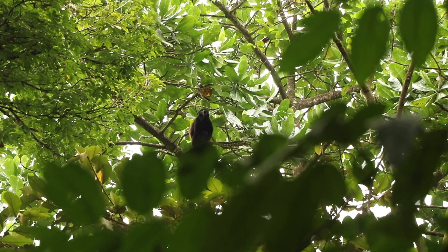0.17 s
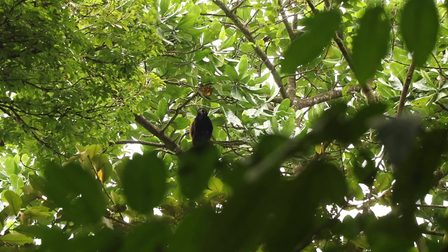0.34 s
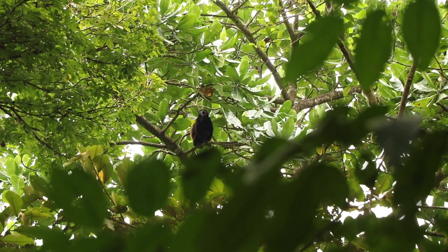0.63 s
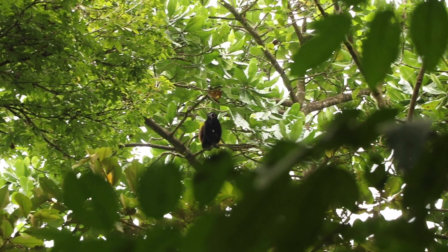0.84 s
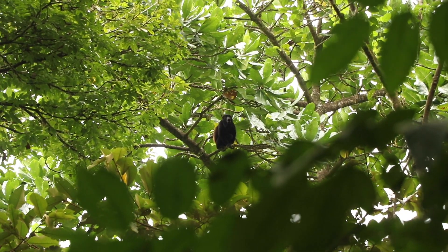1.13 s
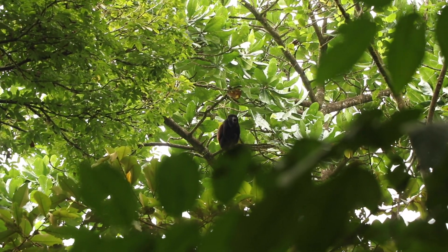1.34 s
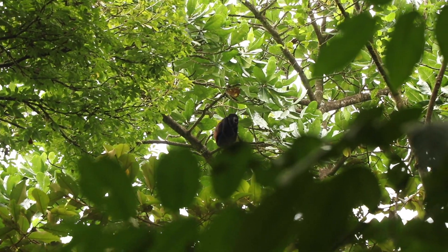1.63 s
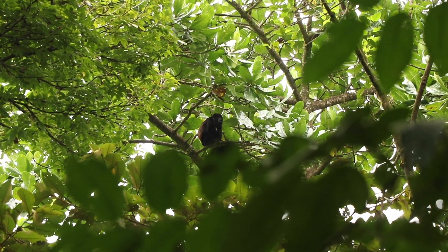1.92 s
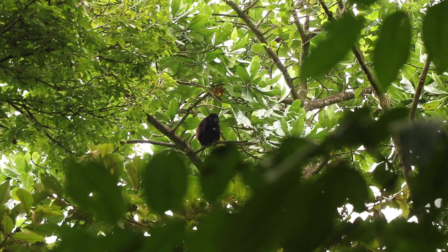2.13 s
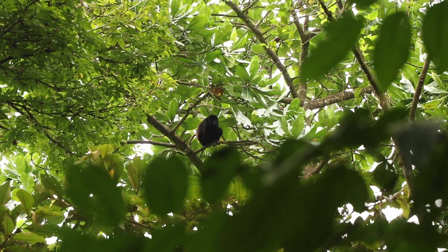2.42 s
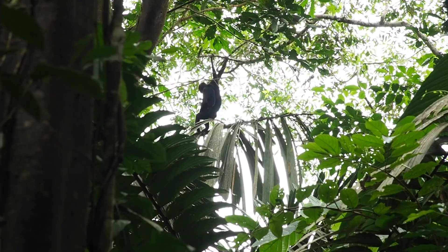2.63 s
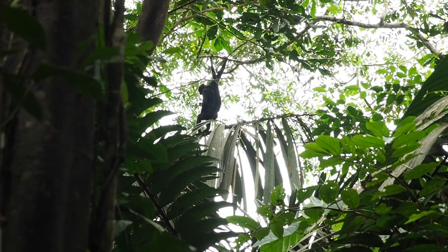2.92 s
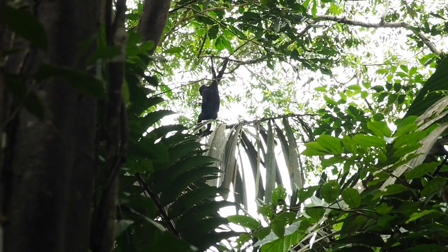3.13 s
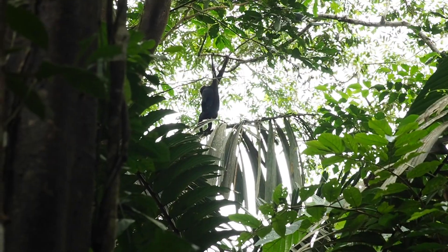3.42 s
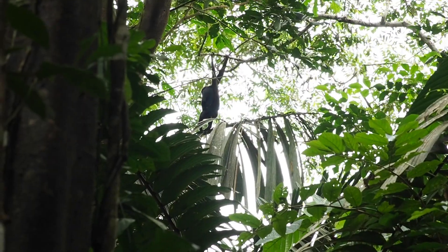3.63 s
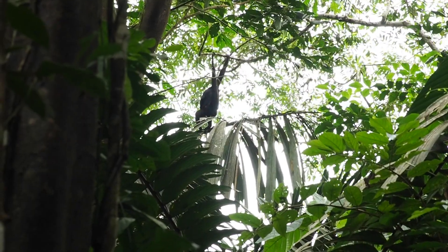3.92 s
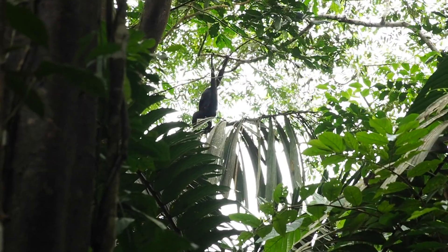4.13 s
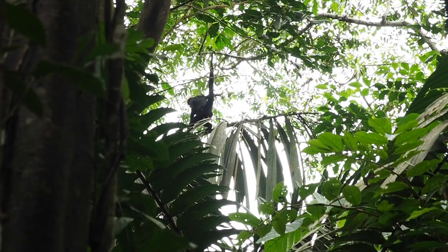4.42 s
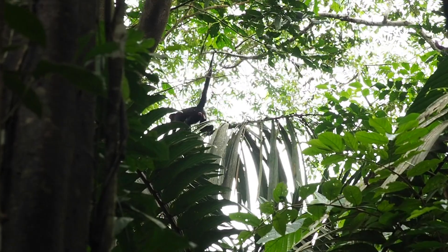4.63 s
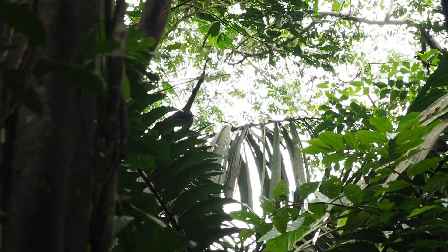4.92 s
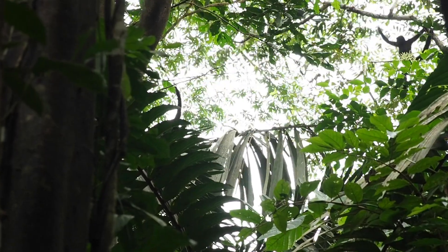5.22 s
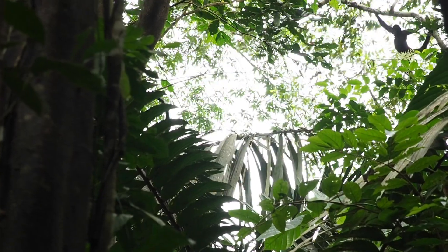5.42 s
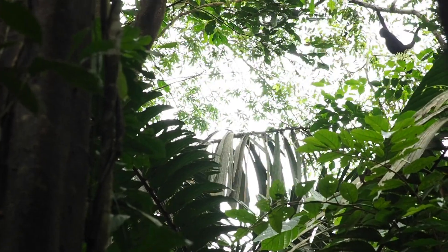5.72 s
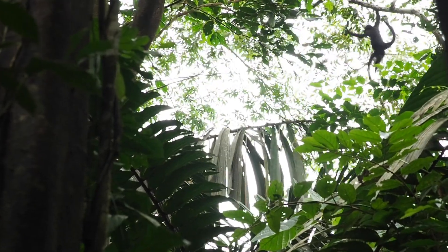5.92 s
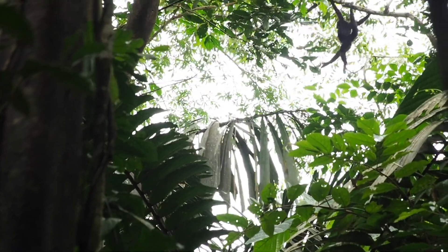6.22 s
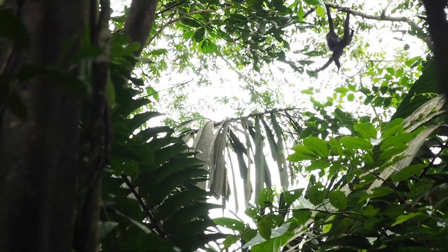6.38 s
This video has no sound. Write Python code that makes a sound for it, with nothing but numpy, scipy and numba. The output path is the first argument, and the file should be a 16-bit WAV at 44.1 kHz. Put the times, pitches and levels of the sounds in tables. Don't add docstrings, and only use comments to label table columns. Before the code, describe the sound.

In a reverberant rainforest, a howler monkey ends a rough roar, gasps in hoarsely, then gives a broken roar and two short barks that die away. Faint far roaring fills the lull. A second monkey swells up, alternating throaty roars with humming in-breaths and a clearer hoot. A cricket and distant insects whine high throughout; a hand-held camera picks up small knocks and leaf ticks.

```python
import sys
import numpy as np
from scipy import signal
from scipy.fft import rfft, irfft
from scipy.io import wavfile
from scipy.ndimage import uniform_filter1d
from numba import njit

SR = 44100
rng = np.random.default_rng(int(sys.argv[2]) if len(sys.argv) > 2 else 0)


def to_wav(s):
    ch = np.atleast_2d(s).T
    pcm = np.round(np.clip(ch, -1, 1) * 32767)
    wavfile.write(sys.argv[1], SR, pcm.astype(np.int16))


def voltage_ratio(decibels):
    exponent = np.asarray(decibels, float) / 20
    return 10 ** exponent


N = 288855
T = np.arange(N) / SR


def unit(x):
    return x / np.sqrt(np.mean(x ** 2))


def noise():
    return rng.standard_normal(N)


def smooth(x, seconds):
    return uniform_filter1d(x, int(seconds * SR))


def walk(rate_hz):
    hold = int(SR / rate_hz)
    steps = np.repeat(rng.standard_normal(N // hold + 1), hold)
    return unit(uniform_filter1d(uniform_filter1d(steps, hold), hold)[:N])


def inside(start_s, end_s, edge_s):
    return np.clip(np.minimum(T - start_s, end_s - T) / edge_s + .5, 0, 1)


def phase(hz):
    return 2 * np.pi * np.cumsum(hz) / SR


@njit
def svf(x, hz, width):
    y, band, low = np.empty(len(x)), 0., 0.
    for i in range(len(x)):
        g, k = np.tan(np.pi * hz[i] / SR), width / hz[i]
        v = (band + g * (x[i] - low)) / (1 + g * (g + k))
        band, low, y[i] = 2 * v - band, low + 2 * g * v, k * v
    return y


def ring(x, hz, width_hz, order=1):
    for _ in range(order):
        x = svf(x, hz + np.zeros(N), 1. * width_hz)
    return x


def held(x):
    return x / np.sqrt(smooth(x ** 2, .07) + 1e-12)


def pair(low_likeness, corner_hz):
    mid, side = rfft(rng.standard_normal((2, N)))
    rolloff = 1 + (np.fft.rfftfreq(N, 1 / SR) / corner_hz) ** 2
    like = np.clip(low_likeness, 0, 1) / rolloff
    return np.sqrt((1 + like) / 2) * mid + np.sqrt((1 - like) / 2) * side * np.array([[1], [-1]])


# pitch_hz [Hz], density_db [dB per Hz]
AIR_COLOUR = [(20, -31), (45, -16), (90, -9.5), (180, -11), (400, -10.5), (1000, -11.5), (3000, -15.5),
              (5000, -21), (6300, -26), (8200, -10), (9500, -24.5), (11500, -29.5), (14000, -20.5),
              (15700, -32.5)]


def air():
    hz, db = np.transpose(AIR_COLOUR)
    log_hz = np.log(np.fft.rfftfreq(N, 1 / SR) + 1)
    colour = voltage_ratio(np.interp(log_hz, np.log(hz), db))
    level_db = -58 + 0.083 * walk(1.73)
    return voltage_ratio(level_db) * unit(irfft(pair(0.63, 1000) * colour, N))


# pitch_hz [Hz], width_hz [Hz], level_db [dB], throb_hz [Hz], throb_depth_db [dB]
INSECT_CHOIRS = [(7577, 263, -55.5, 6.9, 10.5), (7414, 120, -52, 5.9, 4), (7240, 900, -59, 1.7, 1),
                 (6670, 350, -66.5, 5.2, -5), (5790, 360, -62.5, 3.5, 0)]


def chorus():
    out = 0
    for hz, width_hz, db, throb_hz, depth_db in INSECT_CHOIRS:
        swing = np.sin(2 * np.pi * throb_hz * T + walk(1))
        throb = voltage_ratio(db + depth_db * swing + .4 * walk(3))
        out = out + throb * np.array([unit(ring(noise(), hz, width_hz, order=2)) for _ in range(2)])
    return out


# start_s [s], end_s [s], level_db [dB]
FAR_TROOP = (2.46, 3.25, -64.5)


def troop():
    start_s, end_s, db = FAR_TROOP
    far = ring(noise(), 327, 60) + 0.5 * ring(noise(), 510, 73)
    return voltage_ratio(db + 2 * walk(19)) * unit(far) * inside(start_s, end_s, .15)


# start_s [s], peak_db [dB], pitch_hz [Hz], width_hz [Hz], decay_s [s per 60 dB]
KNOCKS_AND_TICKS = [(0, -29, 118, 198, 0.012), (1.212, -45.5, 172, 305, 0.03),
                    (2.543, -47, 298, 138, 0.057), (2.546, -50, 1490, 500, 0.02),
                    (3.844, -58, 11300, 2450, 0.5), (5.451, -45, 2960, 2500, 0.021),
                    (5.491, -47, 2660, 810, .02), (6.144, -53, 2520, 800, 0.023),
                    (2.1, -69, 9800, 880, 0.33), (3.22, -65, 8700, 702, 1), (5.43, -68, 9500, 2560, 0.32)]


def knocks():
    out = 0
    for start_s, db, hz, width_hz, decay_s in KNOCKS_AND_TICKS:
        fade = (T > start_s) * voltage_ratio(-60 * np.clip(T - start_s, 0, 2) / decay_s)
        out = out + voltage_ratio(db) * fade * held(ring(noise(), hz, width_hz, order=2))
    return out


# start_s [s], level_db [dB]
CHIRP_RUNS = [(.001, -1.5), (0.299, 0.82), (1.463, 0.066), (2.084, -1), (3.505, -2), (4.303, -3.9),
              (4.645, -1.5), (4.9, -0.49), (5.979, 0)]


def cricket():
    chirp_s, pair_s, wing_hz, level_db = .0916, .0229, 7570, -55
    starts, run_db = np.transpose(CHIRP_RUNS)
    ends = [*starts[1:], N / SR]
    chirps = np.concatenate([np.arange(a, b - 2 * pair_s, chirp_s) for a, b in zip(starts, ends)])
    at = np.concatenate([chirps, chirps + pair_s])
    db = run_db[np.searchsorted(starts, at + 1e-4) - 1] + 0.92 * rng.standard_normal(len(at))
    strokes = np.zeros(N + SR)
    strokes[(at * SR).astype(int)] = voltage_ratio(db)
    stroke = signal.fftconvolve(strokes, signal.windows.hann(int(0.031 * SR)), "same")[:N]
    teeth = np.sin(phase(wing_hz * (1 + 0.0067 * walk(150)))) + 2 * noise()
    return voltage_ratio(level_db) * unit(ring(stroke * teeth, wing_hz, 310, order=3))


def forest(x):
    tail = 0
    for decay_s, db, corner_hz, top_hz in ((0.24, -4, 1100, 16000), (1, -15, 800, 3000)):
        grains = [ring(c, top_hz / 4, top_hz, order=2) for c in irfft(pair(0.79, corner_hz), N)]
        fade = grains * voltage_ratio(-60 * T / decay_s) * (T > .003)
        tail = tail + voltage_ratio(db) * fade / np.sqrt(np.sum(fade ** 2) / 2)
    return signal.fftconvolve(x[None], tail[:, :2 * SR], axes=1)[:, :N]


def place(x, pan_db, lag_s):
    late = np.roll(x, int(lag_s * SR))
    return np.array([late * voltage_ratio(pan_db / 2), x * voltage_ratio(-pan_db / 2)])


def curves(tables):
    s, *columns = np.concatenate(tables).T
    return [np.interp(T, s, c) for c in columns]


def during(table):
    return inside(table[0][0][0] - .01, table[-1][-1][0] + 0.017, 0.033)


def per_breath(table, rows):
    start, end = np.array([(c[0][0], c[-1][0]) for c in table]).T
    k = np.clip(np.searchsorted(start, T) - 1, 0, None)
    since = np.clip(T - start[k], 0, None)
    gone = np.clip(since / (end - start)[k], 0, 1)
    return since, gone, *np.array(rows)[k].T


def rattle():
    return voltage_ratio(1.55 * walk(60)) * noise()


def warm_db():
    return -63 * np.clip(4.5 - T, 0, .5) * (T > 3)


# start_s [s], end_s [s], from_hz [Hz], to_hz [Hz], level_db [dB]
HUM_TONES = [
    (0.285, 0.497, 253, 222.5, -53),
    (4.7, 4.935, 284.7, 328, -40.5),
    (5.392, 5.652, 290.7, 278, -42.5),
    (6.307, 6.392, 228, 225, -50.5),
]
HUM_SECOND_PARTIAL = [15.5, -13.5, -9.5, -12]


def hums():
    edge_db, steepness, lateness = -25, 7.2, 0.93
    out, waver = 0, 1 + 0.0038 * walk(50)
    first_flutter, second_flutter = voltage_ratio(walk(30)), voltage_ratio(walk(30))
    for (start_s, end_s, from_hz, to_hz, db), octave_db in zip(HUM_TONES, HUM_SECOND_PARTIAL):
        gone = np.clip((T - start_s) / (end_s - start_s), 0, 1)
        glide = gone * gone * (3 - 2 * gone)
        cycle = phase((from_hz + (to_hz - from_hz) * glide) * waver)
        arch_db = edge_db * np.abs(2 * gone ** (1 / lateness) - 1) ** steepness
        swell = np.sqrt(2) * inside(start_s, end_s, 0.016) * voltage_ratio(db + arch_db)
        partials = first_flutter * np.sin(cycle) + voltage_ratio(octave_db) * second_flutter * np.sin(2 * cycle)
        out = out + swell * partials
    return out


# start_s [s], end_s [s], from_hz [Hz], to_hz [Hz], level_db [dB]
GASP_GROWL = (.18, 0.3, 355, 300, -44)


def growl(breath):
    start_s, end_s, from_hz, to_hz, db = GASP_GROWL
    hz = np.interp(T, [start_s, end_s], [from_hz, to_hz])
    return voltage_ratio(db) * inside(start_s, end_s, 0.018) * held(ring(breath, hz, 66, order=2))


def rasp(breath, modes):
    out = 0
    for k, (hz, width_hz, db) in enumerate(modes):
        out = out + (-1) ** k * voltage_ratio(db) * ring(breath, hz, width_hz, order=2) / np.sqrt(width_hz)
    return out


def rasp_db(table, rows, smooth_s, slope):
    *_, over_db, extra_db = per_breath(table, rows)
    effort_db = curves(table)[0]
    db = slope * (effort_db + 40) - 40 + over_db + warm_db()
    return smooth(db, smooth_s), smooth(extra_db, smooth_s)


# pitch_hz [Hz], width_hz [Hz], level_db [dB]
OUT_CAVITIES = [(2010, 260, -9.5), (2810, 280, -8.5), (3292, 270, -0.5), (4086, 440, 0.5), (4596, 165, 6),
                (5290, 570, -11), (5720, 1240, -0.5), (6100, 490, -9), (6000, 1600, -8.5),
                (9500, 260, -18.5), (11200, 830, -33.5)]
# pitch_hz [Hz], width_hz [Hz], level_db [dB]
IN_CAVITIES = [(1947, 120, -12.5), (2430, 340, -4), (3170, 160, -7), (3790, 560, 1.5), (5060, 380, -11.5),
               (6400, 780, -11), (7040, 390, -17), (8700, 3000, -11)]
# pitch_hz [Hz], width_hz [Hz], level_db [dB]
BARK_CAVITIES = [(2090, 940, -5), (3250, 250, 3), (4030, 620, -4), (5060, 220, -4)]
# start_s [s], end_s [s]
GASP = (0.151, .5)


def first_rasp(breath):
    db, extra_db = rasp_db(FIRST_ROARS, FIRST_THROAT, 0.01, 1.22)
    start_s, end_s = GASP
    gasp = inside(start_s, end_s, 0.017)
    since = np.clip(T - start_s, 0, end_s - start_s)
    sink = 1 + 0.044 * (.3 - since / 0.39)
    drawn = voltage_ratio(-15 * since) * held(rasp(breath, [(hz * sink, w, g) for hz, w, g in IN_CAVITIES]))
    main = np.where(T < 1.3, held(rasp(breath, OUT_CAVITIES[:5])), held(rasp(breath, BARK_CAVITIES)))
    blown = main + voltage_ratio(extra_db) * held(rasp(breath, OUT_CAVITIES[5:]))
    return during(FIRST_ROARS) * voltage_ratio(db) * ((1 - gasp) * blown + gasp * drawn)


# start_s [s], low_hz [Hz], high_hz [Hz]
LIP_MOVES = [(4.4, 2034, 3900), (4.63, 1980, 3720), (4.76, 1862, 3730), (4.87, 1890, 3610),
             (5.03, 1956, 3800), (5.14, 1987, 3765), (5.5, 2022, 3800), (5.6, 2010, 3810),
             (5.86, 2010, 3890), (6.5, 2000, 3840)]


def second_rasp(breath):
    low_hz, high_hz = curves([LIP_MOVES])
    db, side_db = rasp_db(SECOND_ROARS, SECOND_THROAT, 0.18, 0.77)
    whistle = voltage_ratio(-0.5 + side_db) * held(ring(breath, low_hz, 36, order=2))
    low = held(ring(breath, low_hz, 180, order=2)) + whistle
    high = held(ring(breath, high_hz, 360, order=2) + .5 * ring(breath, 2997, 160, order=2))
    side = held(rasp(breath, [(4130, 80, 3), (4195, 150, -4), (4170, 820, 6)]))
    return during(SECOND_ROARS) * voltage_ratio(db) * (voltage_ratio(-4.5) * low + high + voltage_ratio(side_db) * side)


def howler(breath, table, rows, lock, lock_s, octave, third_hz, twin, sac_width_hz, mouth_width_hz,
           low_db, middle_hz, middle_db):
    effort_db, swell_db = curves(table)
    settings = per_breath(table, np.c_[rows, lock])
    since, gone, sac_hz, mouth_hz, glide, _, _, third_own_db, spill_own_db, low_own_db, lock = settings
    bend = 1 + glide * (gone - .5)
    sac_hz = uniform_filter1d(sac_hz * bend ** (octave > 0), SR // 8)
    mouth_hz = uniform_filter1d(mouth_hz * bend, SR // 30)

    full_sac = np.clip(.75 + swell_db / 14, .3, 1)
    locked = uniform_filter1d(lock * (1 - np.exp(-since / lock_s)) * full_sac, SR // 30)
    locked = np.maximum(locked, np.clip(-warm_db() / 8, 0, .8) * inside(4.1, 5, .06))
    third_db = effort_db + third_own_db - 15 - 6 * locked + warm_db()
    onset_db = 6 * np.exp(-since / 0.045)
    spill_db = effort_db + spill_own_db - 0.16 * swell_db - 13.5 - 1.5 * locked + onset_db

    cycle = phase(sac_hz * (1 + 0.004 * walk(40)))
    beat = np.sqrt(2 * locked) * voltage_ratio(.8 * walk(25))
    sac = np.sqrt(1 - locked) * held(ring(breath, sac_hz, sac_width_hz, order=2)) + beat * np.sin(cycle)
    mouth = np.sqrt(1 - octave * locked) * held(ring(breath, mouth_hz, mouth_width_hz, order=2))
    mouth = mouth + np.sqrt(octave) * beat * np.sin(2 * cycle)
    shoulder_db = -12 + warm_db() - 12 * locked
    mouth = mouth + voltage_ratio(shoulder_db) * held(ring(breath, 1.08 * mouth_hz, 83, order=2))
    third = held(ring(breath, third_hz, 65, order=2) - twin * ring(breath, 1.08 * third_hz, 80, order=2))
    below = held(ring(breath, 338, 127, order=2) - 0.17 * ring(breath, 206, 85, order=2))
    between = held(ring(breath, middle_hz, 110, order=2))
    spill = voltage_ratio(low_db + low_own_db) * below + voltage_ratio(middle_db) * between
    voice = voltage_ratio(effort_db + swell_db) * sac + voltage_ratio(effort_db) * mouth
    return during(table) * (voice + voltage_ratio(third_db) * third + voltage_ratio(spill_db) * spill)


# time_s [s], effort_db [dB], sac_swell_db [dB over the mouth]
FIRST_ROARS = [
    [(0.0, -30.5, -6), (0.12, -33.5, -2), (0.148, -35.5, -6), (0.165, -66, -19)],
    [(0.17, -41.5, 2), (0.192, -38.5, -1.5), (0.336, -42, -2), (0.392, -44.5, 1), (0.42, -43.5, 4),
     (0.5, -53.5, -8)],
    [(0.505, -44, -6), (0.581, -34.5, -2), (0.653, -42.5, 3.5), (0.849, -36, -3), (1.045, -48.5, 3),
     (1.121, -59.5, 9.5), (1.219, -55.5, -6.5), (1.253, -69, 18), (1.32, -60.5, -5)],
    [(1.33, -62, -5), (1.354, -44, -1.5), (1.424, -38, -2), (1.474, -57, 16.5), (1.57, -55.5, 1)],
    [(1.58, -55, 12), (1.614, -43, 0.5), (1.722, -50.5, 14), (1.794, -60, 13), (2.14, -75, 11.5),
     (2.464, -79, 5), (2.5, -89, 19)],
]
# sac_hz [Hz], mouth_hz [Hz], glide [share], rasp_db [dB over effort],
# extra_cavities_db [dB over rasp]
FIRST_THROAT = [(471.6, 865, 0.038, -9.5, -5), (471.5, 880, 0.02, 0.5, -3), (469, 855, 0.012, -10, 0.5),
                (459.7, 805, -0.12, -18, 6), (470, 800, -0.21, -8, 3)]
# third_resonance_db [dB], spill_db [dB], low_spill_db [dB]
FIRST_TINT = [(0, 0, -6), (-6, 6, -8), (-0.5, 3, -3.5), (-3.5, 4.5, -3), (2.5, 11.5, -3)]
FIRST_FOLDS = [.05, .05, .1, .05, .75]


def first_voice(breath):
    return howler(breath, FIRST_ROARS, np.c_[FIRST_THROAT, FIRST_TINT], FIRST_FOLDS, lock_s=.22, octave=0,
                  third_hz=1361, twin=0.58, sac_width_hz=52, mouth_width_hz=53,
                  low_db=0.26, middle_hz=767, middle_db=-0.2)


# time_s [s], effort_db [dB], sac_swell_db [dB over the mouth]
SECOND_ROARS = [
    [(4.045, -53, 6), (4.07, -48, -6), (4.12, -44.5, -10)],
    [(4.13, -45, -2.5), (4.35, -37.5, 3), (4.434, -33, -12), (4.45, -37, 1.5), (4.61, -37, -5.5),
     (4.662, -39, 8), (4.69, -52, -11)],
    [(4.7, -55, -17), (4.712, -42, -15), (4.794, -46.5, 2.5), (4.93, -45.5, -10)],
    [(4.94, -42, 0.5), (5.014, -35.5, -1.5), (5.102, -39, 7.5), (5.126, -38, -3), (5.314, -36, -2),
     (5.336, -36.5, 4), (5.39, -51, 9)],
    [(5.4, -43.5, -1), (5.468, -45, -12), (5.604, -51, 5), (5.63, -44.5, -15)],
    [(5.64, -49, 3), (5.73, -38, 6), (5.8, -45, 4), (5.815, -42, 12), (5.94, -45, 14), (6.0, -37, 3),
     (6.06, -41, 11), (6.17, -47, 6), (6.4, -59, 5)],
    [(6.41, -56.5, 8.5), (6.476, -38.5, 1), (6.514, -45.5, -0.5), (6.55, -38, -1.5)],
]
# sac_hz [Hz], mouth_hz [Hz], glide [share], rasp_db [dB over effort],
# side_cavity_db [dB over rasp]
SECOND_THROAT = [(375, 732, -.03, -15, 0), (395.4, 797, 0.1207, -15, -16), (385, 875, 0.084, -11, 1),
                 (404, 822, -0.0083, -14.5, -10), (405, 848, -0.017, -10, 2),
                 (404.5, 812, .01, -15.5, -7.5), (428, 804, 0.019, -17.5, -21)]
# third_resonance_db [dB], spill_db [dB], low_spill_db [dB]
SECOND_TINT = [(4, 1.5, 5), (6, -2.3, 2.5), (-1.5, 0.27, -3), (3.5, 1.6, -0.5), (1, -1.2, -7),
               (0.5, 0.49, 1), (-2, 1.8, 0.5)]
SECOND_FOLDS = [.2, .6, 0, .6, 0, .97, .3]


def second_voice(breath):
    return howler(breath, SECOND_ROARS, np.c_[SECOND_THROAT, SECOND_TINT], SECOND_FOLDS, lock_s=.07, octave=.65,
                  third_hz=1335, twin=0.051, sac_width_hz=53, mouth_width_hz=57.5,
                  low_db=3.5, middle_hz=595, middle_db=0)


def scene():
    breath, hum, insect = rattle(), hums(), cricket()
    early = T < 3
    first = first_voice(breath) + hum * early + growl(breath)
    second = second_voice(breath) + hum * ~early
    hiss = first_rasp(breath) + second_rasp(breath)
    direct = place(first, 1, .00001) + place(second, 0.58, .00012) + place(0.58 * hiss, -10.5, .00003)
    direct += place(insect, -13.5, 0) + troop() + knocks()
    scattered = forest(0.78 * (first + second) + 1.006 * hiss + 1.9 * insect)
    return direct + scattered + chorus() + air()


def low_pass(x):
    return signal.sosfilt(signal.butter(12, 15710, fs=SR, output="sos"), x)


def record(dry):
    return low_pass(dry)


dry = scene()
out = record(dry)
to_wav(out)
```